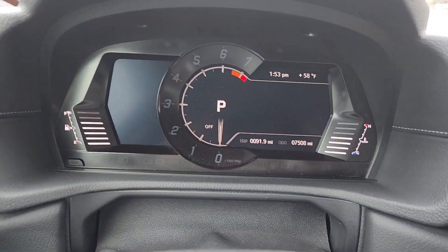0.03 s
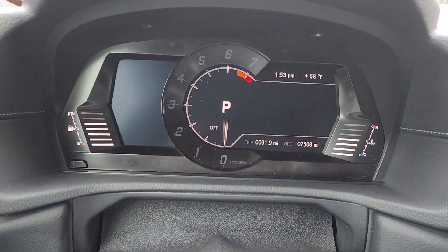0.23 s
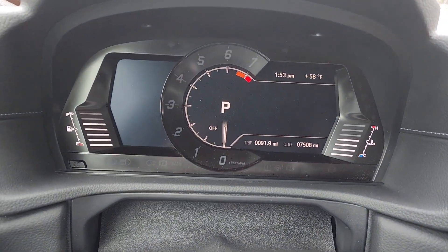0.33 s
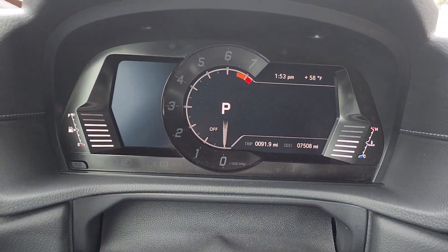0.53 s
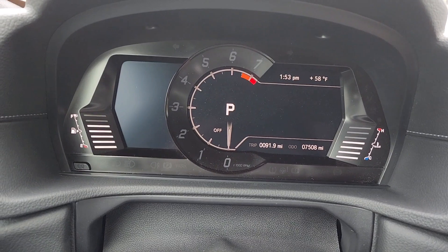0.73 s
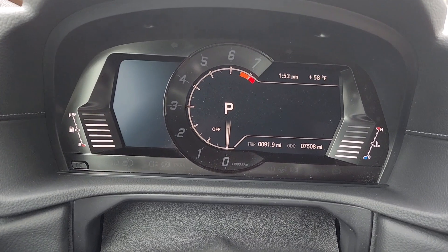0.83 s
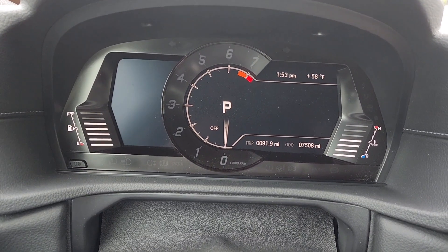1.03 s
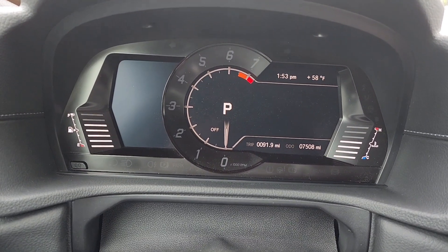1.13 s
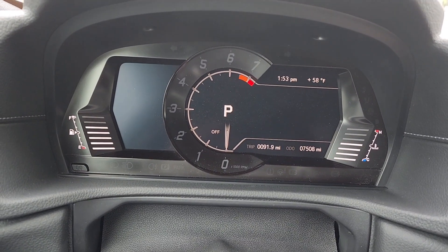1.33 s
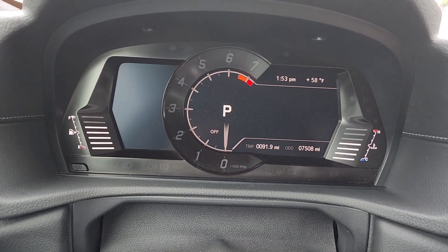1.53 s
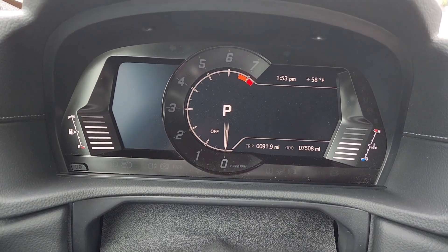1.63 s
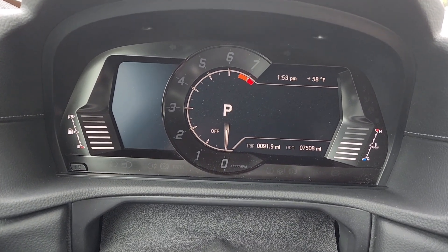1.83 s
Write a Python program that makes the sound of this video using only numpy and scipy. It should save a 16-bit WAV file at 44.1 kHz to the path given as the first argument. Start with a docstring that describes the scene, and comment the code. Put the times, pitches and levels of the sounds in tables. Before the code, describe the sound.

Inside a parked car, close stereo microphones catch a soft, bouncing low thump with faint rustle, then a sharp relay click and later a very faint dull tick, over quiet low rumble and wavering hum.

```python
"""Inside a parked car

Outside rumble rings the cabin's low resonances over a faint hiss, made from shaped and filtered noise
with two wavering hum lines. Something soft thumps the trim and bounces: swelling, dying cycles that ring
a panel. Cloth and trim rustle faintly, as puffs of banded noise. A relay snaps sharply and later drops
back with a dull tick: dying sines plus a burst of noise, with an echo. Two microphone ports listen.
"""
import sys
import numpy as np
from scipy import signal
from scipy.io import wavfile
from scipy.ndimage import uniform_filter1d

SR = 44100
rng = np.random.default_rng(int(sys.argv[2]) if len(sys.argv) > 2 else 0)


def store_pcm(level_fs):
    """Save levels as 16-bit WAV."""
    pcm = np.round(np.clip(level_fs, -1, 1) * 32767).astype(np.int16)
    wavfile.write(sys.argv[1], SR, np.atleast_2d(pcm).T)


def level_to_linear(level):
    """Convert decibel levels to linear amplitude factors, elementwise."""
    exponent = np.asarray(level, float) / 20
    return 10 ** exponent


N = 83790  # length in samples

# Spectrum of the steady rumble: f/Hz, relative level/dB (per Hz)
RUMBLE = [(12, -42.5), (20, -6), (65, -6.5), (95, -10.5), (119, -14.5), (138, -12.5), (184, -8), (207, -24),
          (338, -33.5), (483, -43.5), (700, -37.5), (910, -37.5), (1540, -120)]
# Spectrum of the steady hiss, before it is shifted to join the rumble: f/Hz, level/dB (per Hz)
HISS = [(440, -34), (750, -4), (810, -2.5), (1280, -5.5), (1390, -15), (1520, -8), (2370, -18.5),
        (2880, -22), (4500, -18.5), (6960, -37), (7710, -34.5), (9710, -41), (12100, -29.5), (15000, -35),
        (16000, -43.5)]
HISS_JOIN_DB, STEADY_DB = -34, -48.5  # shift of the hiss; level of rumble and hiss together
# How alike the steady sound is in the two ports: f/Hz, likeness/0 to 1
LIKENESS = [(100, .995), (200, .93), (400, .55), (950, .3), (2400, .3), (6000, .5), (15000, .25)]
# How far the left port is ahead in the steady sound: f/Hz, phase/rad
LEFT_LEAD = [(300, 0), (1200, 1.7), (15000, 1.6)]
# How much louder the left port is in the steady sound: f/Hz, left minus right/dB
LEFT_LEAN = [(60, 0.5), (180, 2.0), (550, 3.5), (1650, 10.5), (4970, 2.5), (15000, 4.5)]
PATCHY_DB, SWELL_DB = 1.0, 0.4  # rms drift of patches in time and pitch, and of the whole level

# Cabin air resonances rung by the rumble: f/Hz, width of each of two passes/Hz, rms level/dB
CABIN = [(44.69, 12, -55.5), (149.9, 4.5, -61.5), (224, 24, -79.5)]
# Wavering hum: t/s, rms level of the low line/dB, rms level of the high line/dB
HUM = [(0, -55, -49.5), (.15, -47, -58.5), (.45, -49, -58), (0.55, -50, -105), (0.586, -59, -81),
       (0.67, -55.5, -53), (0.718, -46.5, -61), (1.076, -52, -56), (1.116, -58, -71), (1.154, -61, -59.5),
       (1.302, -48.5, -51.5), (1.38, -48.5, -58), (1.616, -54, -55), (1.722, -58, -62), (1.748, -46.5, -78),
       (1.794, -47.5, -56), (1.872, -49, -50.5), (1.9, -45, -51.5)]
# Middle pitches of the low and the high hum line: f/Hz, f/Hz
HUM_HZ = (91, 180)
HUM_WANDER_HZ = 2.5  # rms
BASS_LEAN_DB, BASS_LAG_S = 1.15, 0.0001  # left is louder, but right is earlier

# Scuffs and rustles: t/s, level/dB (peak before the top cut), f/Hz, width of each of two passes/Hz,
# rise/s, t60/s (time to die by 60 dB), left minus right/dB
SCUFFS = [(0.087, -58, 375, 176, 0.0013, .08, 1), (.144, -55.5, 800, 200, 0.0026, 0.12, 4),
          (0.2183, -42, 448, 900, .002, 0.15, 5), (0.243, -53, 1484, 1200, 0.0053, .04, -1.5),
          (0.2525, -41.5, 1133, 450, .002, 0.055, 3), (.256, -50, 2556, 400, .002, 0.019, -1),
          (0.2546, -54.5, 3500, 1000, .002, 0.14, 0.5), (0.317, -45.5, 318, 203, 0.0081, 0.048, -10),
          (0.471, -41.5, 372, 600, 0.00212, 0.077, -3), (0.499, -57, 1020, 393, 0.035, 0.36, 1.5),
          (1.81, -59, 1000, 466, 0.03, 0.2, 0)]
SCUFF_TOP_HZ, SCUFF_GRAIN_DB = 4200, 3  # top cut; rms flicker of the level

# Soft thumps: t/s, level/dB, f/Hz, cycles until the swell is fullest
THUMPS = [(0.2213, -12, 149.7, 1.2), (0.2456, -27.5, 110, 0.27), (0.2576, -23, 163.7, 1.1),
          (0.279, -31.5, 99.4, 1.9), (0.3128, -26.5, 147, 1.9), (0.332, -33.5, 173.3, 2.6),
          (0.407, -33, 110, 0.63), (.470, -24.5, 92.5, 0.73)]
# Trim panel that rings after each thump: f/Hz, level against the thump/dB (before softening), t60/s
PANEL = [(110, -20, 0.19), (165.84, -14, 0.46), (273.4, -18, 0.13), (342, -19, 0.11), (386.4, -22.5, .25),
         (480, -77.5, .2), (590, -33, .15)]

# Relay: t/s, level/dB, dulling per octave away from the third case mode/dB, extra loss per bounce/dB
RELAY = [(1.0365, -36.5, 0.5, 2), (1.6597, -36.5, 21.5, 3.5)]
# Relay case and bracket: f/Hz, level/dB (before dulling), t60/s
CASE = [(772, -6.5, 0.035), (1110, -9.5, 0.023), (1607, -6.5, 0.008), (1863, -9, 0.022), (2290, -3, 0.0069),
        (2950, -3, 0.026), (3750, -2.5, 0.003), (4640, -5, 0.0055), (6750, -19, 0.0052), (9200, -12.5, .01),
        (10700, -24, 0.0056), (11500, -20, 0.0058), (14000, -18.5, 0.0092)]
# Contact chatter after each snap: delay/s, level/dB (before the loss per bounce)
CHATTER = [(0, -3.5), (.0005, 1), (.0013, -5), (.0025, -5), (.0085, -16)]
CRACK_DB, CRACK_T60 = -6, 0.008  # noise burst: level before dulling; seconds to die by 60 dB
RELAY_LEAN_DB, RELAY_LAG_S, SHADOW_HZ = 4, 0.0006, 6870  # left is louder, earlier and brighter
# Cabin echo: f/Hz, t60/s
ECHO = [(500, .12), (2000, .09), (6000, .055), (14000, .03)]
ECHO_DB = -7  # against the direct sound

LOW_CUT_HZ, TOP_HZ = 34, 16000  # microphone range


def evened(x):
    """Scales a sound so that its rms is 1."""
    return x / np.sqrt(np.mean(x ** 2) + 1e-20)


def read(points, hz):
    """Reads a table between its points, on a log-frequency axis."""
    f, value = np.transpose(points)
    return np.interp(np.log(hz + 1), np.log(f + 1), value)


def add(mix, s, sound):
    """Mixes a sound in at time s, cutting off what runs past the end."""
    part = mix[..., round(s * SR):][..., :sound.shape[-1]]
    part += sound[..., :part.shape[-1]]


def resonate(x, hz, width):
    """One resonance of gain 1: shift hz down to zero, smooth, and shift back up."""
    turn = np.exp(2j * np.pi * hz * np.arange(x.shape[-1]) / SR)
    r = np.exp(-np.pi * width / SR)
    return 2 * (turn * signal.lfilter([1 - r], [1, -r], x / turn)).real


def rings(modes, t, tilt_db=0):
    """Sum of dying sines of alternating sign; tilt_db weakens modes per octave away from the third."""
    total = np.zeros(len(t))
    for k, (hz, db, t60) in enumerate(modes):
        octaves = abs(np.log2(hz / modes[2][0]))
        total += (-1) ** k * level_to_linear(db - tilt_db * octaves - 60 * t / t60) * np.sin(2 * np.pi * hz * t)
    return total


def rumble_and_hiss():
    """Random spectra with drifting patches; the two ports grow less alike as the likeness falls."""
    frames, hz = N // 512 + 5, np.fft.rfftfreq(2048, 1 / SR)
    a, b, c, d, patches = rng.standard_normal((frames, 1025, 5)).T
    patches = evened(uniform_filter1d(uniform_filter1d(patches, 16, 0), 6, 1))
    swell = evened(uniform_filter1d(rng.standard_normal(frames), 20))

    same = np.clip(read(LIKENESS, hz), -1, 1)[:, None]
    lead = read(LEFT_LEAD, hz)[:, None]
    lean = level_to_linear(read(LEFT_LEAN, hz) / 2)[:, None]
    left = a + 1j * b
    right = same * left * np.exp(-1j * lead) + np.sqrt(1 - same ** 2) * (c + 1j * d)
    ports = np.array([left * lean, right / lean])

    # Dividing by this gives the average of both ports the tabled spectrum.
    mid = np.sqrt((lean ** 2 + lean ** -2 + 2 * same * np.cos(lead)) / 4)
    joined = RUMBLE[:-2] + [(f, db + HISS_JOIN_DB) for f, db in HISS[1:]]
    level = read(joined, hz)[:, None] + PATCHY_DB * patches + SWELL_DB * swell
    sound = signal.istft(ports * level_to_linear(level) / mid, nperseg=2048, noverlap=1536)[1][:, :N]
    return level_to_linear(STEADY_DB) * evened(sound)


def cabin_drone():
    """Noise through narrow cabin resonances, and two hum lines that wander in pitch and level."""
    out = np.zeros(N)
    for hz, width, db in CABIN:
        noise = rng.standard_normal(N + SR)
        ringing = resonate(resonate(noise, hz, width), hz, width)
        out += level_to_linear(db) * evened(ringing[SR:])  # skip the build-up
    s, *levels = np.transpose(HUM)
    for hz, db in zip(HUM_HZ, levels):
        wander = HUM_WANDER_HZ * evened(uniform_filter1d(rng.standard_normal(N), size=3000))
        level = np.sqrt(2) * level_to_linear(np.interp(np.arange(N) / SR, s, db))
        out += level * np.sin(2 * np.pi * np.cumsum(hz + wander) / SR)
    return out


def scuffs():
    """Cloth and trim rustle as short puffs of banded noise, partly unlike in the two ports."""
    out, t = np.zeros((2, N)), np.arange(SR // 2) / SR
    for s, db, hz, width, rise, t60, lean_db in SCUFFS:
        noise = rng.standard_normal((2, len(t)))
        noise[1] = evened(noise[0] + noise[1])  # the ports share part of the noise
        grain = evened(uniform_filter1d(rng.standard_normal(len(t)), size=60))
        noise *= level_to_linear(SCUFF_GRAIN_DB * grain)
        band = resonate(resonate(noise, hz, width), hz, width)
        puff = np.minimum(t / rise, 1) ** 2 * level_to_linear(-60 * np.maximum(t - rise, 0) / t60) * band
        puff /= abs(puff).max(1, keepdims=True)
        add(out, s, level_to_linear(db) * level_to_linear([[lean_db / 2], [-lean_db / 2]]) * puff)
    return signal.sosfilt(signal.butter(8, SCUFF_TOP_HZ, fs=SR, output="sos"), out)


def thumps():
    """Each thump is a few damped cycles that swell and die, and it sets the panel ringing."""
    out, t = np.zeros(N), np.arange(SR // 2) / SR
    ring = -rings(PANEL, t)
    for s, db, hz, cycles in THUMPS:
        u = t * hz / cycles  # 1 when the swell is fullest
        blow = -(u * np.exp((1 - u ** 2) / 2)) ** 2 * np.sin(2 * np.pi * hz * t)
        push = np.hanning(max(round(SR / hz / 2), 3))  # half a cycle long, softens the ringing
        panel = np.convolve(ring, push / push.sum())[:len(t)]
        add(out, s, level_to_linear(db) * (blow + panel))
    return out


def echo(x):
    """Cabin echo: sparse taps of random sign, other taps per port, each band dying at its own speed."""
    taps = np.zeros((2, SR // 4))
    at = np.arange(40, SR // 4 - 20, 20) + rng.integers(0, 20, (2, (SR // 4 - 41) // 20))
    np.put_along_axis(taps, at, rng.choice([-1., 1.], at.shape), 1)
    hz, t, z = signal.stft(taps, SR, nperseg=128)
    fade = level_to_linear(-60 * t / read(ECHO, hz)[:, None])
    tail = signal.istft(z * fade, SR, nperseg=128)[1]
    return signal.fftconvolve(x[None], tail / np.linalg.norm(tail[0]), axes=1)[:, :N]


def relay():
    """A noisy crack and the ringing case, repeated by contact chatter and echoed by the cabin."""
    dry, t = np.zeros(N), np.arange(SR // 8) / SR
    for s, db, dull_db, loss_db in RELAY:
        for k, (delay, bounce_db) in enumerate(CHATTER):
            noise = np.diff(rng.standard_normal(len(t) + 1))  # bright noise
            crack = level_to_linear(CRACK_DB - 2 * dull_db - 60 * t / CRACK_T60) * noise
            hit = rings(CASE, t, dull_db) + crack
            add(dry, s + delay, level_to_linear(db + bounce_db - k * loss_db) * hit)
    lean = level_to_linear([[RELAY_LEAN_DB / 2], [-RELAY_LEAN_DB / 2]])
    direct = np.array([dry, np.roll(dry, round(RELAY_LAG_S * SR))])
    left, right = lean * (direct + level_to_linear(ECHO_DB) * echo(dry))
    return np.array([left, signal.lfilter(*signal.butter(1, SHADOW_HZ, fs=SR), right)])


def scene():
    """Everything in the cabin; the bass is slightly louder on the left and earlier on the right."""
    bass = cabin_drone() + thumps()
    bass = np.array([bass, np.roll(bass, -round(BASS_LAG_S * SR))])
    bass *= level_to_linear([[BASS_LEAN_DB / 2], [-BASS_LEAN_DB / 2]])
    return rumble_and_hiss() + bass + scuffs() + relay()


def band_limit(x):
    """A steep low-pass at the top of the band."""
    return signal.sosfilt(signal.butter(12, 16380, fs=SR, output="sos"), x)


def record(dry):
    """The microphone's low cut and band limit shape the finished mix."""
    cut = signal.sosfilt(signal.butter(4, LOW_CUT_HZ, "high", fs=SR, output="sos"), dry)
    mix = signal.sosfilt(signal.butter(12, TOP_HZ, fs=SR, output="sos"), cut)
    return band_limit(mix)


dry = scene()
out = record(dry)
store_pcm(out)
```